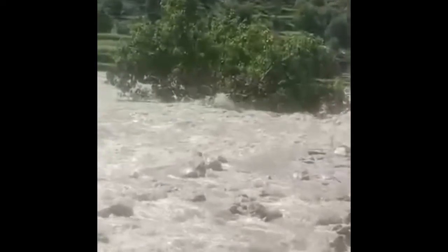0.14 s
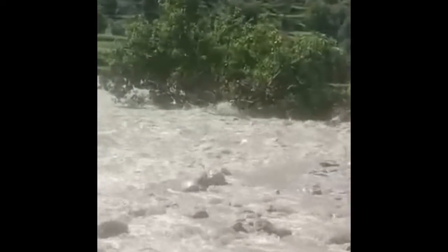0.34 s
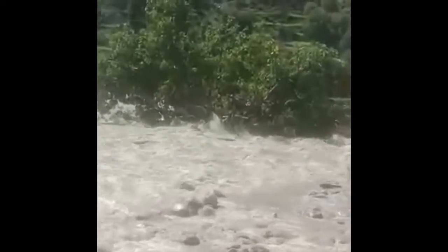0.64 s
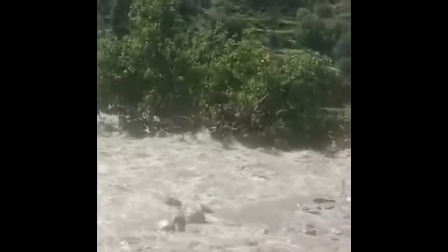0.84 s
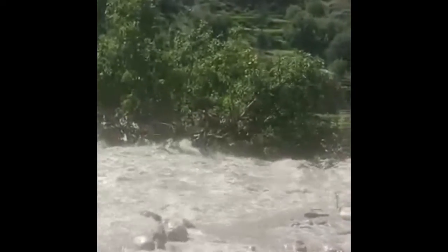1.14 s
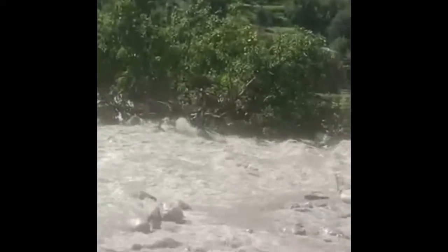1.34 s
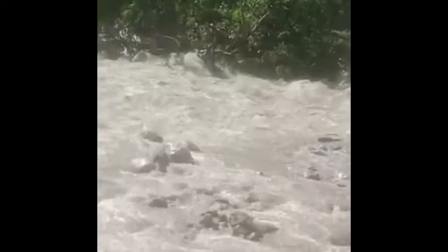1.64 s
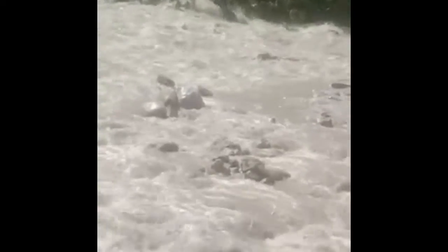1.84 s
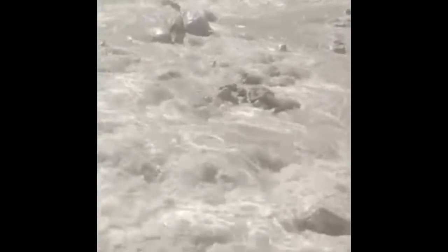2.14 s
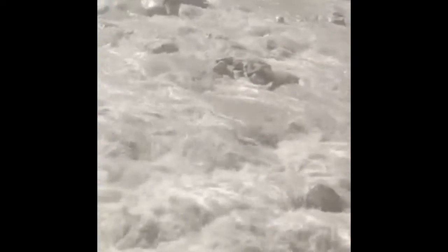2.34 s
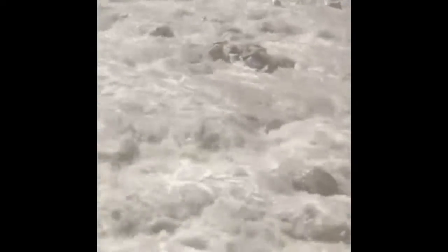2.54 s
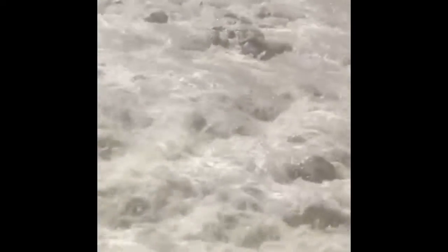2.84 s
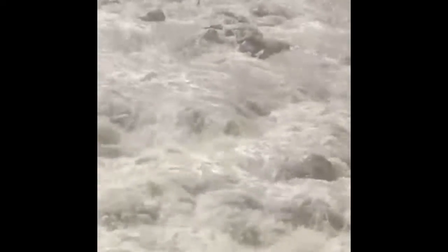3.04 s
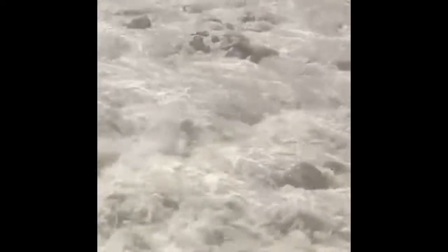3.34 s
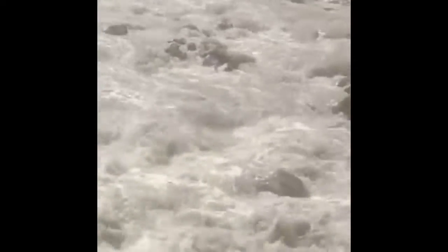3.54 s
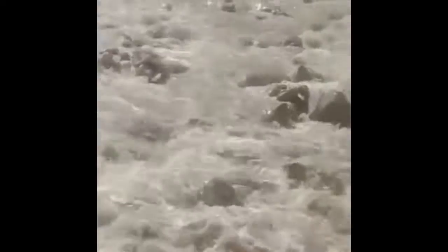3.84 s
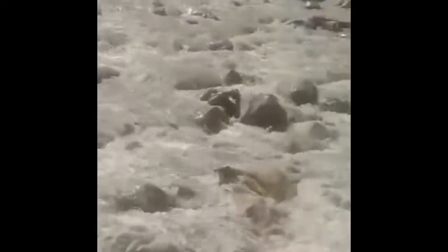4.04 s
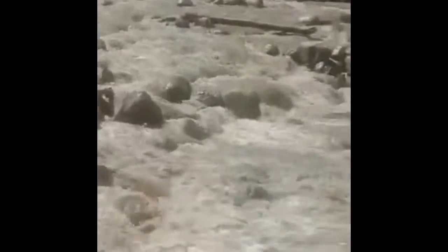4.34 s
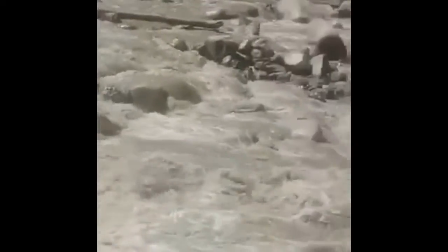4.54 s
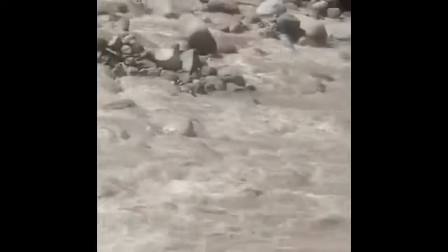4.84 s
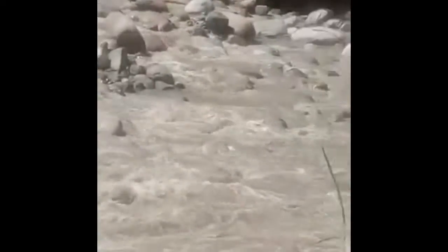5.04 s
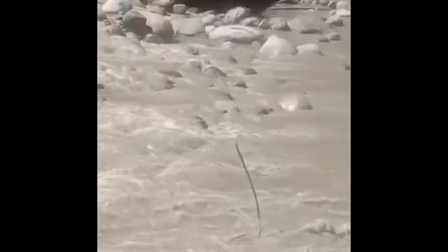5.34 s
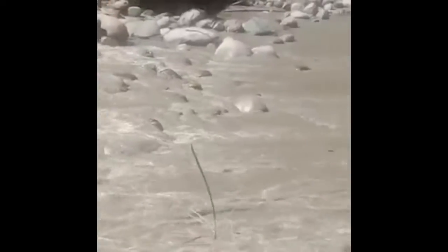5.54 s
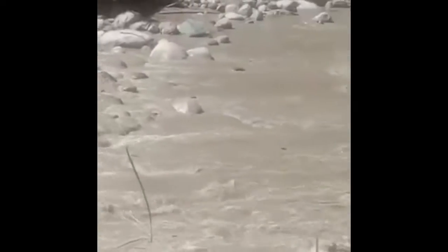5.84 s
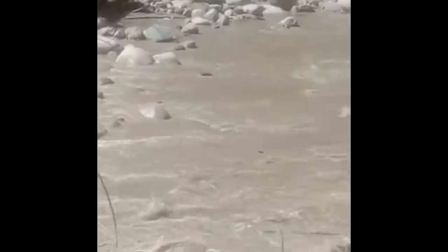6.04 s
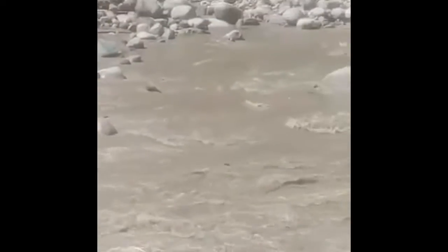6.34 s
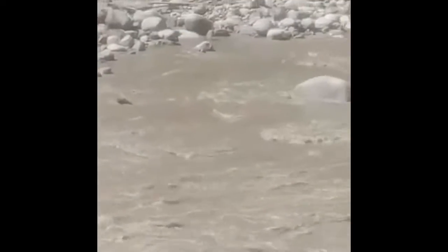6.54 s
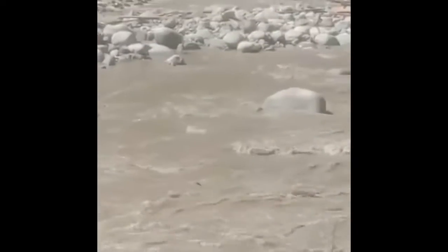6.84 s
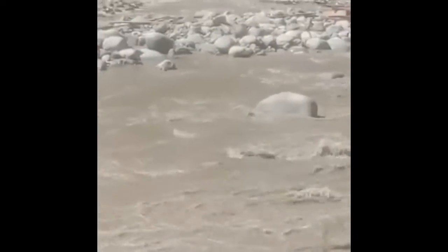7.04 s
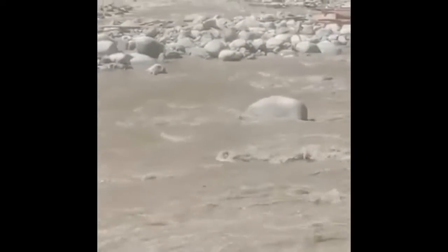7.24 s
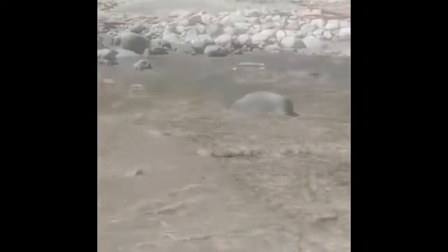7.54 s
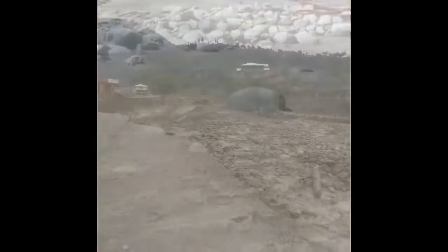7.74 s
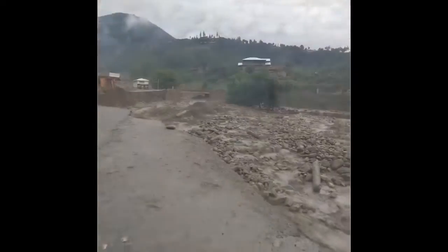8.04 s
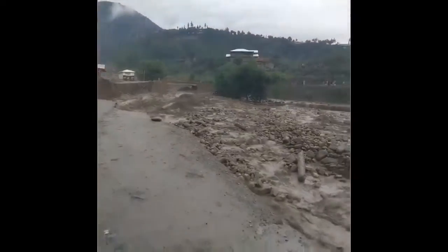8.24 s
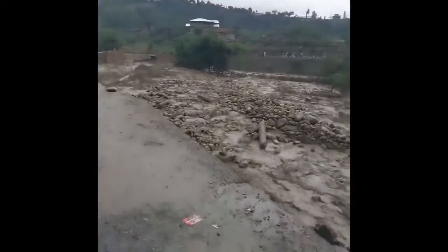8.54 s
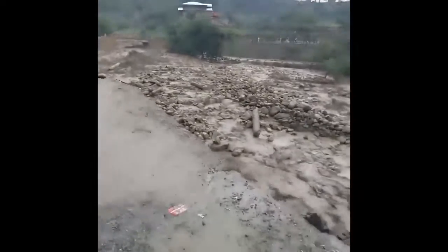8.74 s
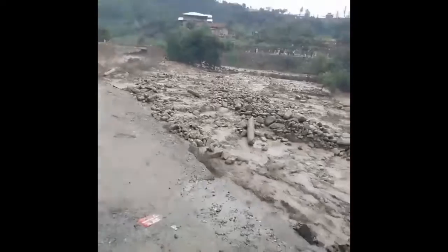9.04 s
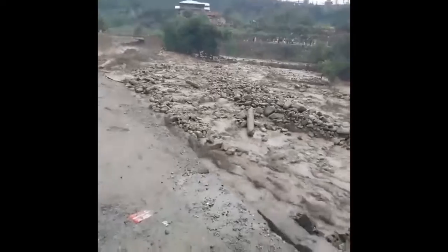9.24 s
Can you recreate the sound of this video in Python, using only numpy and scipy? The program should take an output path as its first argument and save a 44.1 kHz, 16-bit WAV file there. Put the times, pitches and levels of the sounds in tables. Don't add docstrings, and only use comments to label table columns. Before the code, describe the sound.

Muddy floodwater roars steadily over boulders through a dull phone microphone, then cross-fades to a deeper, louder, surging rumble weighted to the right.

```python
import sys
import numpy as np
from scipy import signal
from scipy.io import wavfile
from scipy.ndimage import uniform_filter1d, map_coordinates

SR = 44100
rng = np.random.default_rng(int(sys.argv[2]) if len(sys.argv) > 2 else 0)


def invert_db(level):
    return 10 ** (np.asarray(level, dtype=float) / 20)


def master(y):
    cut = np.clip(np.atleast_2d(y).T, -1, 1)
    pcm = np.round(cut * 32767)
    wavfile.write(sys.argv[1], SR, pcm.astype(np.int16))


N = 414540
FRAME = 2048


def curve(table, hz):
    table_hz, value = np.transpose(table)
    return np.interp(np.log(np.maximum(hz, 1)), np.log(table_hz), value)


def sound(cells):
    return signal.istft(cells, SR, nperseg=FRAME, noverlap=FRAME * 3 // 4)[1][:N]


def foam():
    noise = rng.standard_normal(N + FRAME) * np.sqrt(SR / 2)
    hz, s, cells = signal.stft(noise, SR, nperseg=FRAME, noverlap=FRAME * 3 // 4)
    bass = hz < 450
    power = abs(cells[bass]) ** 2
    lumps = uniform_filter1d(uniform_filter1d(power, size=11, axis=0), size=9, axis=1)
    cells[bass] *= np.sqrt(lumps.mean() / lumps)
    return hz, s, cells


def patches(hz, s, width_hz, length_s):
    grid = rng.standard_normal((512, 1024))
    place = np.meshgrid(hz / width_hz, s / length_s, indexing="ij")
    field = map_coordinates(grid, place, order=1, mode="wrap")
    return field / field.std()


def flow(control, law, waves, hz, s):
    wave_s, wave_octaves = 0.051, 1.1
    t, level_db = np.transpose(control)
    law_hz, share, drift_db = np.transpose(law)
    swell = np.outer(curve(np.transpose([law_hz, share]), hz), np.interp(s, t, level_db))
    from_middle_s = np.clip(s, t[0], t[-1]) - (t[0] + t[-1]) / 2
    swell += np.outer(curve(np.transpose([law_hz, drift_db]), hz), from_middle_s)
    for at_s, lift_db, mid_hz in waves:
        reach = np.exp(-(np.log2(np.maximum(hz, 1) / mid_hz) / wave_octaves) ** 2)
        swell += lift_db * np.outer(reach, np.exp(-((s - at_s) / wave_s) ** 2))
    wander_db = 0.56 * patches(hz, s, 487, .09)
    return swell + wander_db


def water(colour_db, swell_db, patch, hz, s, width_hz, length_s, surge_db):
    spread = curve(patch, hz)[:, None]
    flicker = spread * patches(hz, s, width_hz, length_s) - spread ** 2 * np.log(10) / 20
    surge = surge_db * patches(hz, s, 2000, .07) / (1 + (hz[:, None] / 200) ** 2)
    return invert_db(colour_db[:, None] + swell_db + flicker + surge)


def kept(lost, hz, s, width_hz, length_s, spare=1):
    luck = rng.random((512, 1024))
    band, moment = (hz / width_hz).astype(int), (s / length_s).astype(int)
    return luck[np.ix_(band, moment)] >= curve(lost, hz)[:, None] * spare


# time in seconds, level in dB.
FACING = [(0, 1.6), (.6, 2), (.75, 1), (1.5, 1), (2.5, 2), (3.0, 2), (3.6, 2), (3.72, -1), (4.1, -3),
          (4.8, -2.5), (6.15, -2), (6.4, 0), (6.8, -2), (7.3, 0.5), (7.55, 1), (7.9, -2)]
# frequency in Hz, dB per dB of facing, drift in dB per s.
RAPIDS_LAW = [(250, 0.05, 0), (1040, 1, 0), (1790, 0.2, -0.04), (2720, 0.9, -0.88), (6600, 1.5, -.5)]
# time in seconds, lift in dB,
# centre in Hz.
WAVES_NEAR = [(-1, 3, 250), (0.6, 3.5, 250), (1.2, 3, 250), (1.68, 1, 250), (2.28, 3, 250), (3.55, 3, 230),
              (4.11, 0.5, 250), (4.35, 5, 240), (5.19, 1, 250), (5.43, 2.5, 250), (6.03, 3.5, 250),
              (6.3, 2, 250), (6.63, 1, 250), (7.15, 0.5, 1500), (1.5, -0.5, 1500), (3.5, 7, 74),
              (0.2, 5, 70), (1, 3.5, 70), (1, -6, 60), (1.9, -3.5, 170)]


def rapids_swell(hz, s):
    swell = flow(FACING, RAPIDS_LAW, WAVES_NEAR, hz, s)
    swell *= 1 - .55 * np.exp(-((hz[:, None] - 3500) / 250) ** 2)
    return swell * np.clip((10000 - hz[:, None]) / 1500, 0, 1)


# frequency in Hz, density
# in dB per Hz.
RAPIDS_COLOUR = [(45, -76.5), (75, -63.5), (110, -57), (220, -50.5), (440, -53), (800, -53), (1300, -54),
                 (1700, -53.5), (1800, -58.5), (2050, -69), (2700, -74), (3530, -74), (3640, -89), (4300, -107),
                 (4600, -114), (5200, -110), (6050, -107.7), (6500, -96), (6900, -97.5), (7300, -106.5),
       (7750, -103.9), (8300, -114), (9300, -126), (12800, -119.5), (14000, -121.7), (15400, -113.8)]
# frequency in Hz, spread in dB.
RAPIDS_PATCH = [(60, 3.5), (200, 1), (1800, .6), (2500, 2.8), (3400, 2), (3900, 4), (5400, 1.5), (6600, 6),
                (7700, 3.6), (10000, 1.5)]
# frequency in Hz, share of blocks lost from 0 to 1.
RAPIDS_LOST = [(30, .3), (70, .12), (110, .04), (160, 0), (3800, 0), (4200, .35), (4600, .85), (5080, .88),
               (5150, 0)]


def rapids():
    relief_s, relief = 3.7, .5
    hz, s, cells = foam()
    colour_db = curve(RAPIDS_COLOUR, hz)
    gain = water(colour_db, rapids_swell(hz, s), RAPIDS_PATCH, hz, s, 100, .033, 1.0)
    spare = 1 - relief * np.outer(hz > 1000, s > relief_s)
    rush = sound(cells * gain * kept(RAPIDS_LOST, hz, s, 260, .046, spare))
    return signal.sosfilt(signal.butter(2, 63.6, "high", fs=SR, output="sos"), rush)


def knocks(table, lift_db):
    rise_s = .011
    out, t = np.zeros(N + FRAME * 4), np.arange(FRAME * 4) / SR
    shape = t / rise_s * np.exp(1 - t / rise_s)
    for s, db, hz in table:
        out[int(s * SR):][:len(t)] += invert_db(db + lift_db) * shape * np.sin(2 * np.pi * hz * t)
    return out[:N]


# start in seconds, peak in dB, pitch in Hz.
KNOCKS_NEAR = [(0.429, -31, 110), (1.132, -28.5, 128), (1.537, -35, 94.2), (1.746, -32, 96.9),
               (2.242, -30, 116), (2.755, -33, 127), (3.939, -31, 114), (4.146, -32, 127),
               (4.543, -34, 121), (4.699, -32, 116), (4.914, -34, 105), (5.616, -34, 112),
               (5.826, -37, 99.6), (6.49, -29, 121), (6.768, -36, 129), (7.095, -26.5, 125),
               (3.66, -30.5, 78), (.96, -32, 75), (6.58, -34, 85)]


def near_knocks():
    return knocks(KNOCKS_NEAR, 2)


# frequency in Hz, gain in dB.
COVER = [(30, -13), (110, -15), (300, -17.4), (600, -19.6), (1000, -21.4), (1500, -21.3), (2000, -29.4),
         (2600, -43.7)]


def cover_db(hz):
    return curve(COVER, hz)


# frequency in Hz, dB per dB of swell, drift in dB per s.
FLOOD_LAW = [(200, 1, -0.7), (800, -0.8, 1.5), (2420, 0.1, -1.5), (8000, -0.25, 2.3)]
# time in seconds, level in dB.
SWELL = [(7.5, 1.5), (7.9, -2), (8.4, 0), (8.8, -2), (8.95, 2), (9.4, -0.5)]
# time in seconds, lift in dB, centre in Hz.
WAVES_DEEP = [(5.4, -1, 200), (8.3, 2.5, 200), (8.28, 1, 1800), (8.4, 2, 670), (8.5, 5.5, 180),
              (8.7, 1.5, 550), (8.68, 2.5, 160), (8.9, 6.5, 330), (9.2, 3, 170), (9.33, 3.5, 150),
              (8.1, 1, 1700), (7.79, 3, 6000), (8.2, 1.5, 1800), (8.15, 3, 90)]
# frequency in Hz, density in dB per Hz.
DEEP = [(25, -70), (60, -41.5), (110, -40), (220, -40), (330, -49.5), (500, -58.5), (750, -55), (1300, -61),
        (2400, -59), (4300, -67.5), (7200, -70), (8500, -84.5), (12000, -78.5), (15300, -89)]
# frequency in Hz, spread in dB.
FLOOD_PATCH = [(60, 1), (300, 0.5), (600, 1.5), (8000, 0.4), (15000, 2)]
# frequency in Hz, share of blocks lost from 0 to 1.
FLOOD_LOST = [(7900, 0), (8300, .4), (9300, .3), (10300, 0), (13300, 0), (14300, .4), (15500, .9)]
# frequency in Hz, share common to both from 0 to 1.
LIKENESS = [(60, .96), (300, .93), (430, .82), (560, .62), (750, .74), (1050, .15), (3000, 0)]


def flood():
    turn_rad, lag_s = .2, .00042
    hz, s, cells = foam()
    gain = water(curve(DEEP, hz), flow(SWELL, FLOOD_LAW, WAVES_DEEP, hz, s), FLOOD_PATCH, hz, s, 120, .04, 0.83)
    gain *= kept(FLOOD_LOST, hz, s, 200, 0.042) | (s < 7.78) | (s > 8.17)
    mist = np.interp(s, (7.74, 7.76, 7.9, 8.4), (.6, 1, 0.96, 0))
    gain *= invert_db(5 * np.outer(hz > 9500, mist))
    like = np.clip(curve(LIKENESS, hz), 0, 1)[:, None]
    late = np.exp(-1j * (turn_rad + 2 * np.pi * hz * lag_s))[:, None]
    muffled = like * late * cells + np.sqrt(1 - like ** 2) * foam()[2]
    cover = invert_db(cover_db(hz)) * (hz < 2720)
    hiss = invert_db(-130) * foam()[2]
    left = sound(muffled * gain * cover[:, None] + hiss)
    return np.array([left, sound(cells * gain)])


# start in seconds, peak in dB, pitch in Hz.
KNOCKS_DEEP = [
    (8.131, -16, 77.4),
    (8.327, -23, 112),
    (8.37, -14.5, 103.2),
    (8.435, -20, 118),
    (8.614, -11, 108),
    (8.829, -18, 127.3),
    (8.92, -17.5, 117.6),
    (9.016, -13.5, 126.7),
    (9.187, -17.5, 124.7),
]


def deep_knocks():
    return knocks(KNOCKS_DEEP, 2) * invert_db([[cover_db(100)], [0]])


def scene():
    t = np.arange(N) / SR
    fade = np.interp(t, (7.295, 8.295), (0, 1))
    first = rapids() + near_knocks()
    first = np.roll(first, -np.argmin(first[:FRAME // 8]))
    second = flood() + deep_knocks()
    second = signal.sosfilt(signal.butter(2, 45, "high", fs=SR, output="sos"), second)
    squeeze = 1.1
    second = np.tanh(squeeze * second) / squeeze
    entry = np.clip((t - 7.335) / .02, 0, 1)
    return (1 - fade) * first + fade * entry * second


def low_pass(x):
    return signal.sosfilt(signal.butter(12, 15680, fs=SR, output="sos"), x)


def record(dry):
    return low_pass(dry)


dry = scene()
out = record(dry)
master(out)
```